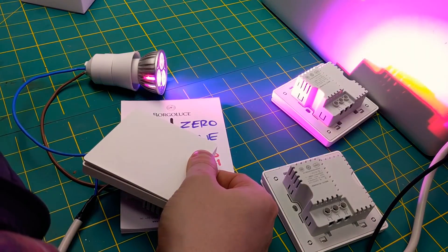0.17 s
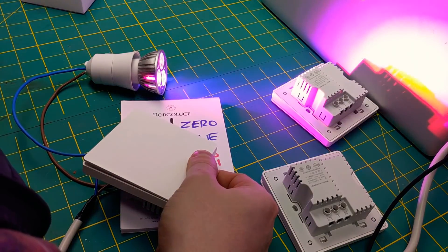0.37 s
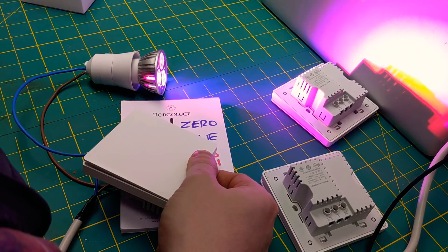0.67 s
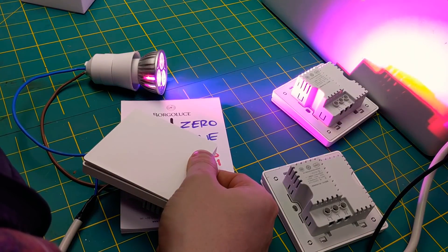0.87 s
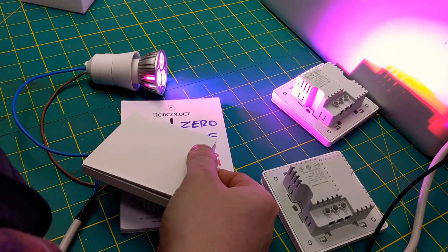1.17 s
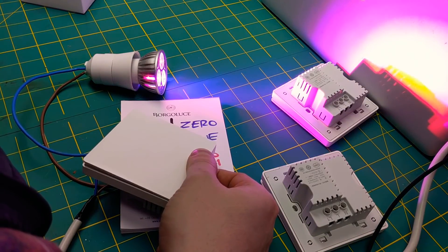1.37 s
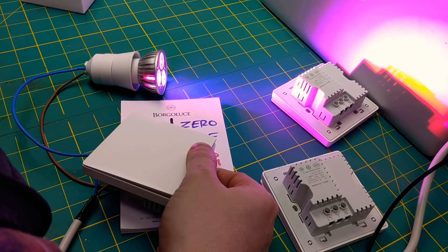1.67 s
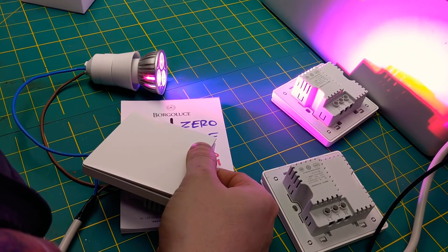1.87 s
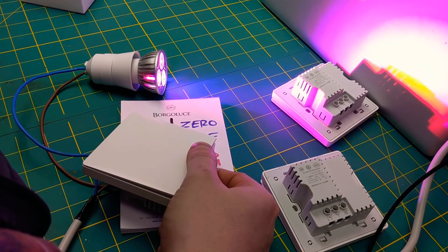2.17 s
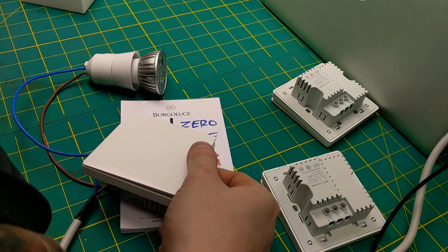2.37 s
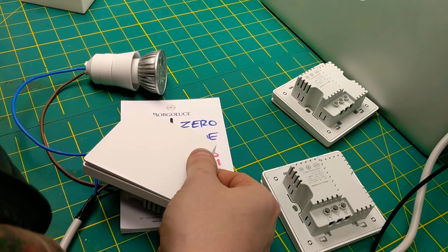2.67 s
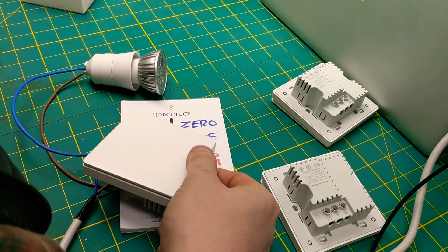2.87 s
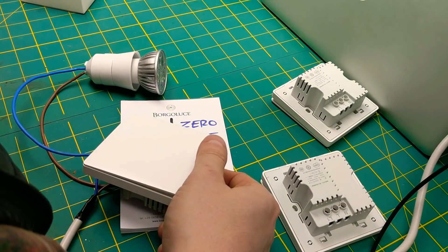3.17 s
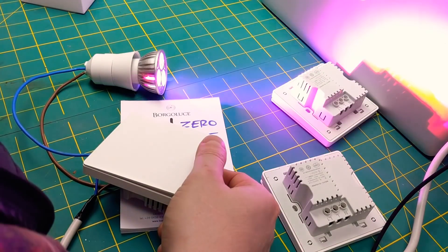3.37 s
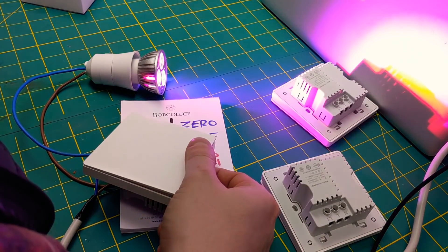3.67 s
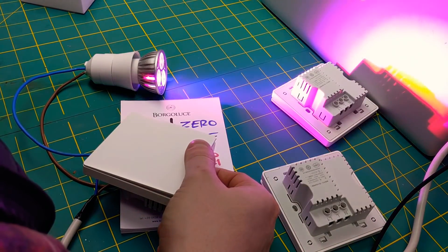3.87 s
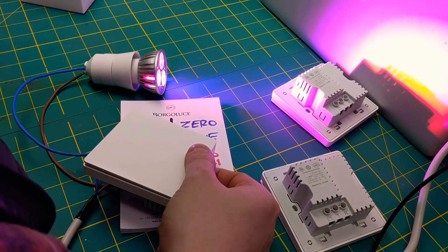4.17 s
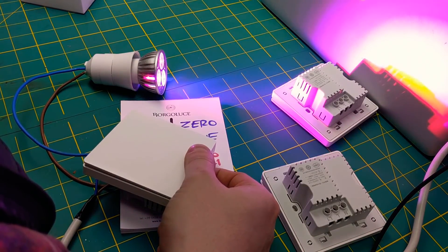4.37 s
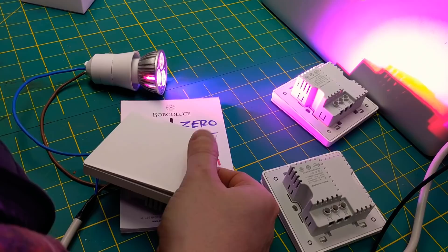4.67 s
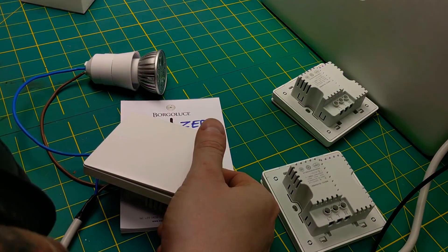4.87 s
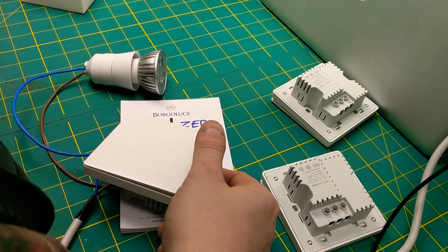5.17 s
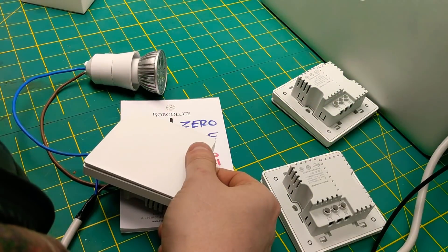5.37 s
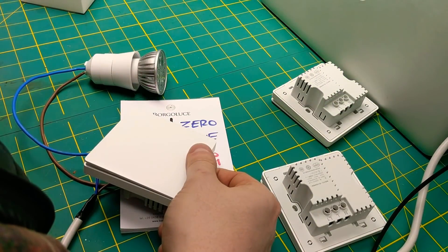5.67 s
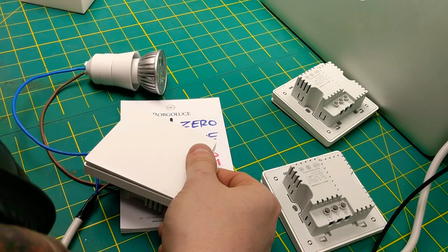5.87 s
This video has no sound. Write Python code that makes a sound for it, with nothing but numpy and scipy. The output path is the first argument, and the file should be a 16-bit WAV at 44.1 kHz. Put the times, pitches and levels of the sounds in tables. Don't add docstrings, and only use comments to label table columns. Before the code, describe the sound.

A hollow plastic light switch is handled on a desk in a small quiet room, miked closely in mono. Single presses give a tiny tick, a hard crack and, after varying holds, a lighter spring-back clack. Dull slaps make the plate clatter and knock. A rapid burst of three presses is the loudest moment, then one more slap, a weak release and gentle thumb taps. Low hum and thin hiss continue underneath.

```python
import sys
import numpy as np
from scipy import signal
from scipy.fft import rfft, irfft, next_fast_len
from scipy.io import wavfile
from scipy.ndimage import uniform_filter1d, map_coordinates

SR = 44100
rng = np.random.default_rng(int(sys.argv[2]) if len(sys.argv) > 2 else 0)


def volts(x):
    e = np.asarray(x, float) / 20
    return 10 ** e


def unload_wav(signal):
    wavfile.write(
        sys.argv[1],
        SR,
        np.round(np.clip(np.atleast_2d(signal).T, -1, 1) * 32767).astype(np.int16),
    )


N = 265526
SPAN = 16384

# start_s, peak_db, body_db, brightness_db, desk_ring_db
SNAPS = [
    (1.343, -10, 2, 1.5, -2.5),
    (1.801, -11.5, 2, -2, -0.5),
    (3.065, -8, 2, 1, 1),
    (4.424, -9, 2.5, 0.5, 3.5),
    (4.638, -7.5, 2, -0.5, 3.5),
    (4.811, -5.5, 1.5, 0, 3),
]
TICKS = [
    (1.2526, -32.5, 1, -10.5, -5.5),
    (1.7674, -31.5, -2, -6, -2),
    (2.0767, -52, -20, 9, 9),
    (3.037, -31, -3, -4, 3),
    (3.1717, -47.5, -8, -4, 1.5),
    (4.3854, -32.5, -2.5, -2, -4),
    (4.6134, -33, 1, -8, -4.5),
         (4.7932, -29.5, 3.5, -4, -4),
    (5.001, -59, -12, 2, 0),
    (5.044, -50.5, -11, -0.5, 0),
]
RELEASES = [
    (1.4698, -24.5, 1.5, -3, -4),
    (2.7739, -22.5, -1, -2.5, 3.5),
    (4.1619, -23, 1, -4, -0.5),
    (4.5086, -23, 1.5, -3.5, 1),
    (4.6956, -22, 0.5, -3, -0.5),
    (5.5323, -26, 3, -5.5, 0),
]
SPRINGS = [
    (1.4639, -34.5, 2.5, -19, -0.5),
    (2.7702, -31, -6, -0.5, 0),
    (4.1563, -31, 3.5, -2.5, -9),
    (4.5047, -32.5, -3.5, -4, -7.5),
    (4.6898, -30.5, 0, 0, 0),
    (5.5255, -31.5, 0.5, 1, 1.5),
]
RATTLES = [
    (2.4144, -10.5, -9, -6, 0),
    (3.362, -18, 15, -9.5, -1.5),
    (3.3904, -23.5, -12.5, -2.5, 1.5),
    (3.4002, -10.5, 4, -3.5, -5.5),
    (5.0767, -38.5, -5, -7, 0),
    (5.1121, -12.5, -8.5, -4, -3),
]
SEATS = [
    (2.422, -12.5, 0.018, 0.0057, 0.0012),
    (5.125, -13, 0.0047, 0.0073, 0.0077),
]

# pitch_hz, width_hz, level_db
SNAP_MODES = [(234, 9.9, -6), (260, 21, -15), (565.5, 42, 3.5), (892.4, 230, -20.5), (1095, 224, -1),
              (1350, 69.5, 4), (1960, 200, -2.5), (2498.4, 340, -1), (3205, 36, -6), (3775, 86, -5.5),
              (4457, 110, -3.5), (5628, 190, -5.5), (7060, 187, -3), (10500, 1800, -14.5),
              (12370, 370, -6.5), (14980, 740, -14)]
TICK_MODES = [(920, 280, -5.5), (1760, 190, 1), (2520, 140, -4.5), (4000, 260, -4.5), (8500, 1500, -20.5),
              (11380, 2000, -14.5)]
RELEASE_MODES = [(227.4, 7, -1), (270, 27, -10.5), (364, 52, -5), (750, 120, -10.5), (1745, 260, -7),
                 (1756, 47, 0), (2392, 57, -6.5), (2950, 270, -9), (4126, 140, -5.5), (5830, 1000, -16),
                 (8070, 44, -7.5), (9090, 350, -4.5), (11110, 470, -4), (13100, 2000, -9.5)]
SPRING_MODES = [(1512, 550, -0.5), (1876, 250, 3), (2920, 1400, -4.5), (4494, 640, -25)]
RATTLE_MODES = [(470, 186, 1), (2260, 284, 2), (4000, 390, -5.5), (5770, 480, -4.5), (8700, 1000, -7.5),
                (12800, 1300, -19)]
SEAT_MODES = [(238, 23, -25.5), (460, 72, 1), (556, 58, -10), (770, 150, -13.5), (1020, 68, 0.5),
              (1247, 67, 3.5), (1874, 270, -1), (2440, 437, -6.5), (4000, 1700, -16), (6900, 3500, -17),
              (12180, 3000, -24)]

# start_s, peak_db, pitch_hz, t60_s
HOUSING_RINGS = [(0.17, -57.5, 249.3, 0.092), (2.097, -44.5, 380, 0.047), (2.205, -52.5, 460, 0.045),
                 (2.259, -44.5, 520, 0.022), (2.353, -53.5, 483, 0.12), (2.402, -55, 480, 0.06),
                 (2.496, -64, 260, 0.062), (2.598, -55, 482.7, 0.034), (3.297, -44.5, 407, 0.0257),
                 (3.335, -38, 393, 0.041), (3.345, -35.5, 494, 0.012), (3.409, -47.5, 460, 0.1),
                 (5.074, -49, 483, 0.11), (5.913, -57.5, 438, 0.088), (5.941, -50, 244, 0.052),
                 (5.972, -36, 407, 0.04), (5.996, -37, 355, 0.021),
                 (2.4235, -22.5, 494, 0.0685),
    (5.126, -24.5, 470, 0.06),
    (3.3625, -24.5, 512, 0.094),
    (3.3687, -15, 683, 0.031),
    (3.376, -28, 494, 0.052),
    (3.3923, -22.5, 481, 0.038),
    (3.449, -61, 311.1, 0.82),
]
# start_s, peak_db, scrape_db
DRAGS = [
    (0.0, -67, 9),
    (2.099, -57.5, 0.5),
    (2.268, -71, 3.5),
    (2.424, -42, -8.5),
    (2.606, -72, -2),
    (3.337, -58, 4),
    (3.367, -30, -13.5),
    (3.404, -43.5, -17.5),
    (5.128, -43.5, -8),
]
# firmest_s, level_db, scrape_db, swell_db_per_s, fade_db_per_s
SLIDES = [
    (0.05, -69.5, 8, 28.5, 45),
    (2.25, -73, 3, 29, 58),
    (2.35, -66.5, 6.5, 900, 40.5),
    (2.41, -58.5, 13, 249.5, 153),
    (3.328, -70.5, 4, 74.5, 15),
    (5.056, -65, 11, 89, 56),
    (5.084, -55.5, 8, 600, 300),
    (5.194, -81.5, 5, 90, 70),
    (5.99, -69, 2, 153, 60),
]
# start_s, peak_db
JOLTS = [
    (2.426, -40),
    (2.452, -49.5),
    (3.362, -33.5),
    (3.389, -49),
    (3.4145, -36),
    (5.122, -45),
    (5.158, -54),
    (5.96, -55),
    (5.992, -48.5),
]
# pitch_hz, level_db, t60_s
DESK_MODES = [(50, -6, .25), (78, 0, .3), (118, -1, .28)]

# frequency_hz, density_db_per_hz
SKIN_SPECTRUM = [(120, -33.5), (250, -3.5), (480, 0), (900, -9.5), (1500, -14.5), (3000, -60)]
SCRAPE_SPECTRUM = [(500, -23.5), (1000, 2), (2200, 2.5), (4000, -4.5), (6000, -11), (9000, -41)]
RUMBLE_SPECTRUM = [(15, -43), (35, -4.5), (60, 0), (80, -4), (125, -3.5), (170, -16.5), (300, -48.5)]
HISS_SPECTRUM = [(76, -30.5), (130, 3.5), (216, -3.5), (254, -2), (365, -5.5), (457, -6.5), (516, -7.5),
                 (594, -10), (1850, -15), (6110, -11), (7640, -23), (11000, -12), (13200, -26),
                 (15200, -18), (16500, -53)]
WHINE_SPECTRUM = [(10400, -41), (10730, -9.5), (10800, 0.5), (10870, -6), (11200, -41)]
# frequency_hz, t60_s
ROOM_DECAY = [(200, 0.19), (600, 0.092), (2000, 0.1296), (5000, .15), (12000, 0.1224)]
# frequency_hz, gain_db
ECHO_COLOUR = [(200, -3.5), (1000, 1.5), (3000, 0), (5000, 1), (7000, -4), (10000, 2), (15000, 0)]
# frequency_hz, gain_db
MICROPHONE = [(15600, 1), (15900, -26), (16900, -26), (17150, -84.5)]


def switch():
    return (strike(SNAPS, SNAP_MODES, chatter_s=0.0008286, gain_db=-1.5, room_db=-6.0, soft_hz=30000, blur=3.5)
            + strike(TICKS, TICK_MODES, chatter_s=0.00088, gain_db=-1.5, room_db=-9,
                     soft_hz=30480, blur=1.3)
            + strike(RELEASES, RELEASE_MODES, chatter_s=0.001, gain_db=-1.7, room_db=-4.5,
                     soft_hz=29000, blur=2.2)
            + strike(SPRINGS, SPRING_MODES, chatter_s=0.00005, gain_db=-12, room_db=5, soft_hz=900, blur=1.3)
            + strike(RATTLES, RATTLE_MODES, chatter_s=0.0014, gain_db=-7.0, room_db=-1.5,
                     soft_hz=30650, blur=3.5)
            + strike(SEATS, SEAT_MODES, chatter_s=0.000962, gain_db=-2.0, room_db=0.5,
                     soft_hz=11900, blur=2.735))


def strike(events, modes, chatter_s, gain_db, room_db, soft_hz, blur):
    out = np.zeros(N + SPAN)
    t, f = np.arange(SPAN) / SR, np.fft.rfftfreq(2 * SPAN, 1 / SR)
    hz, width, mode_db = np.transpose(modes)[:, :, None]
    polarity = (-1.) ** np.arange(len(modes))[:, None]
    contact = polarity / (1 + 1j * f / soft_hz) ** 2
    wide = width * np.where(hz > 300, blur, 1)
    near = contact * resonance(f, hz, width)
    far = contact * resonance(f, hz, wide) * np.sqrt(width / wide) * volts(along(ECHO_COLOUR, hz))
    for start_s, peak_db, body_db, bright_db, desk_db in events:
        envelope = np.sqrt(t / chatter_s) * np.exp(-t / chatter_s)
        chatter = rfft(rng.standard_normal(SPAN) * envelope, 2 * SPAN)
        chatter /= uniform_filter1d(np.abs(chatter), size=901) + 1e-9
        tilt_db = body_db * (hz < 900) + bright_db * (hz > 5000) + desk_db * (hz < 300)
        gains = volts(mode_db + rng.normal(0, 1, hz.shape) + tilt_db)
        blow = np.exp(-2j * np.pi * f * chatter_s * rng.uniform(0.45, 2, hz.shape))
        push = np.where(hz < 3300, blow, chatter)
        direct = irfft((push * gains * near).sum(axis=0))[:SPAN]
        reflected = irfft((gains * far).sum(axis=0))[:SPAN]
        echo = signal.fftconvolve(reflected, room())[:SPAN]
        level = volts(peak_db + gain_db) / np.abs(direct).max()
        out[round((start_s + 0.0005) * SR):][:SPAN] += level * (direct + volts(room_db) * echo)
    return out[:N]


def resonance(f, hz, width):
    return 1j * f * width / (hz * hz - f * f + 1j * f * width)


def thumb():
    return housing() + friction()


def housing():
    out, t = np.zeros(N + SPAN), np.arange(SPAN) / SR
    # 2 dB above the level listed in SPRINGS, before the housing's own
    # gain, 1620 Hz, t60 0.017 s
    twangs = [(start_s, peak_db + 2, 1620, 0.017) for start_s, peak_db, *_ in SPRINGS]
    for start_s, peak_db, hz, t60 in HOUSING_RINGS + twangs:
        envelope = (1 - np.exp(-t / 0.0015)) * volts(-60 * t / t60)
        tones = np.sin(2 * np.pi * hz * t) + 0.5 * np.sin(2 * np.pi * 1.2 * hz * t)
        pad = envelope * tones
        echo = signal.fftconvolve(pad, room())[:SPAN]
        out[round(start_s * SR):][:SPAN] += volts(peak_db - 2.0) * (pad + volts(-8.5) * echo)
    return out[:N]


def friction():
    lumps = volts(3 * wobble(70))
    skin = unit(lumps * noise(SKIN_SPECTRUM))
    scrape = unit(lumps * noise(SCRAPE_SPECTRUM))
    rise_db_per_s, fall_db_per_s = 3000.5, 457
    strokes = SLIDES + [(*drag, rise_db_per_s, fall_db_per_s) for drag in DRAGS]
    out = np.zeros(N)
    for peak_s, level_db, scrape_db, rise, fall in strokes:
        out += touch(peak_s, level_db, rise, fall) * (skin + volts(scrape_db - 15) * scrape)
    return out


def touch(peak_s, level_db, rise_db_per_s, fall_db_per_s):
    t = np.arange(N) / SR - peak_s
    return volts(level_db + np.where(t < 0, rise_db_per_s * t, -fall_db_per_s * t))


def desk():
    out, t = np.zeros(N + SPAN), np.arange(SPAN) / SR
    lag_s, rise_s, crest_s = 0.005, 0.006, 0.0195
    moving = np.clip(t - lag_s, 0, None)
    sway = np.zeros(SPAN)
    for hz, level_db, t60 in DESK_MODES:
        sway += volts(level_db - 60 * moving / t60) * np.cos(2 * np.pi * hz * (t - crest_s))
    thud = (1 - np.exp(-moving / rise_s)) * sway
    thud /= np.abs(thud).max()
    jolts = JOLTS + [(start_s, peak_db - 20.5) for start_s, peak_db, *_ in RELEASES]
    jolts = jolts + [(start_s, peak_db - 49.5) for start_s, peak_db, *_ in SNAPS]
    for start_s, peak_db in jolts:
        out[round(start_s * SR):][:SPAN] += volts(peak_db) * thud
    return out[:N]


def room():
    hz, t, z = signal.stft(rng.standard_normal(SPAN), SR, nperseg=128)
    decay = volts(-60 * t / along(ROOM_DECAY, hz)[:, None])
    tail = signal.istft(z * decay, SR, nperseg=128)[1][:SPAN]
    tail = np.pad(tail, (round(0.0028 * SR), 0))[:SPAN]
    return tail / np.linalg.norm(tail)


def background():
    whine = volts(-84) * noise(WHINE_SPECTRUM)
    hiss = volts(-70 + 0.18 * wobble(3.7)) * noise(HISS_SPECTRUM)
    return hum() + whine + hiss + rumble()


def hum():
    phase = 2 * np.pi * 99.26 * np.arange(N) / SR + 0.063 * wobble(27)
    return np.sqrt(2) * np.sin(phase) * volts(-58.5 + 1.5 * wobble(26) + 0.6 * wobble(1.7))


def rumble():
    shaken = volts(-71.5 + 2 * wobble(8.4)) * noise(RUMBLE_SPECTRUM)
    return coloured(shaken, [(20, -20.0), (40, 4.5), (150, -3), (250, -30.5)])


def unit(x):
    return x / np.sqrt(np.mean(x ** 2) + 1e-20)


def along(points, hz):
    f, value = np.transpose(points)
    return np.interp(np.log(hz + 1), np.log(f + 1), value)


def wobble(rate):
    knots = rng.standard_normal(int(N * rate / SR) + 4)
    return map_coordinates(knots, [np.arange(N) * rate / SR])


def noise(spectrum):
    return unit(coloured(rng.standard_normal(N), spectrum))


def coloured(x, spectrum):
    m = next_fast_len(N + SPAN)
    gain = volts(along(spectrum, np.fft.rfftfreq(m, 1 / SR)))
    return irfft(rfft(x, m) * gain, m)[..., :N]


def scene():
    return (switch() + thumb() + desk() + background())[None]


def band_limit(x):
    return signal.sosfilt(signal.butter(12, 17140, fs=SR, output="sos"), x)


def record(dry):
    mix = coloured(dry, MICROPHONE)
    return band_limit(mix)


dry = scene()
out = record(dry)
unload_wav(out)
```